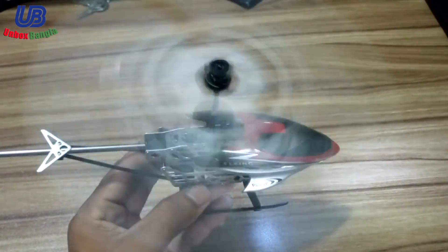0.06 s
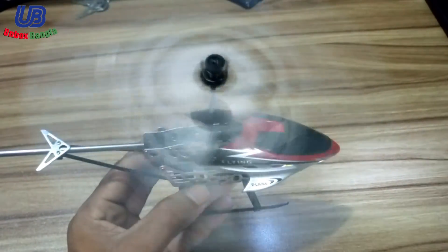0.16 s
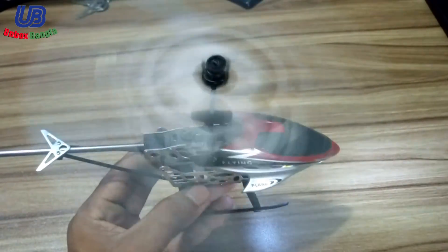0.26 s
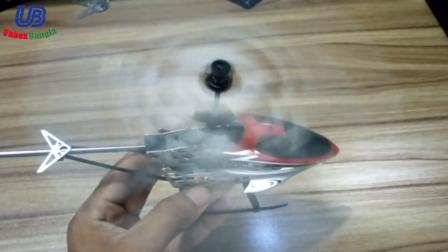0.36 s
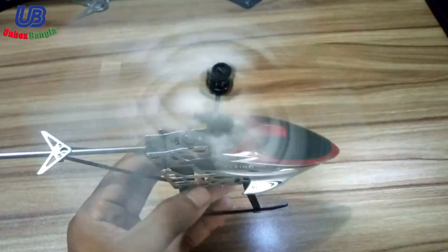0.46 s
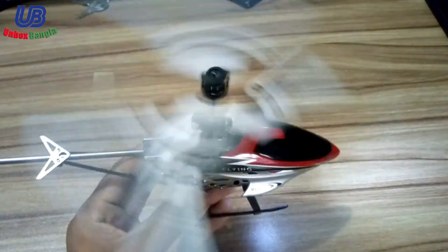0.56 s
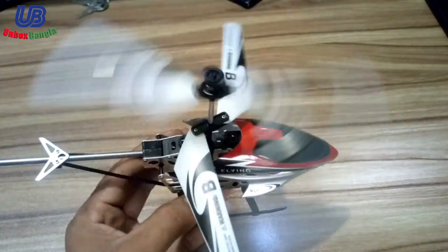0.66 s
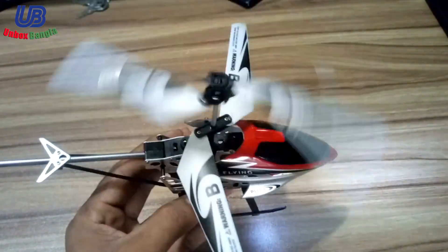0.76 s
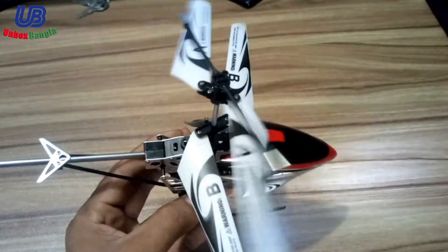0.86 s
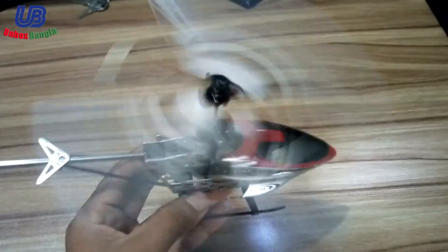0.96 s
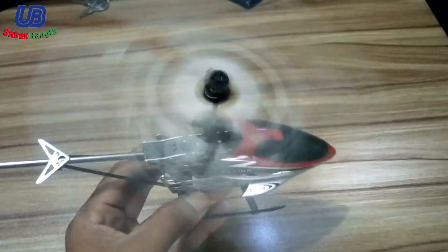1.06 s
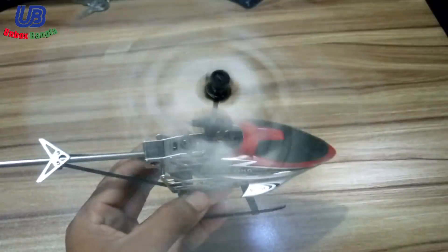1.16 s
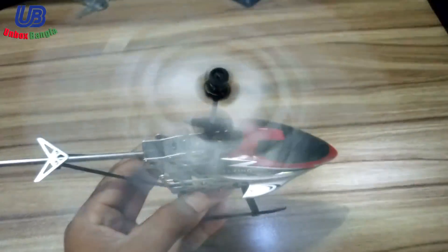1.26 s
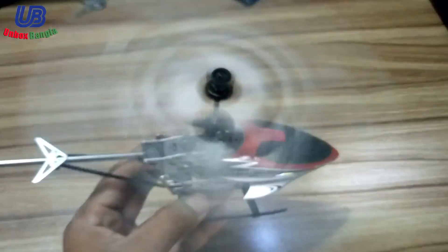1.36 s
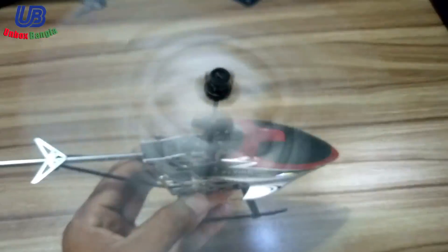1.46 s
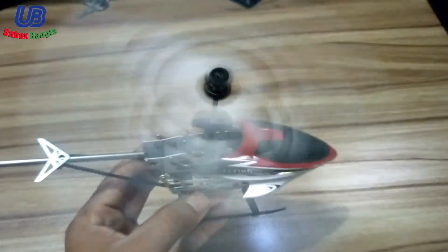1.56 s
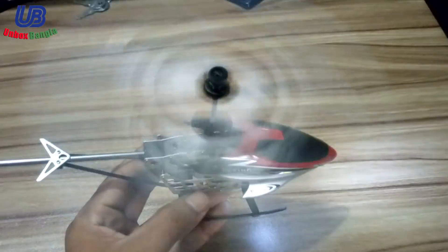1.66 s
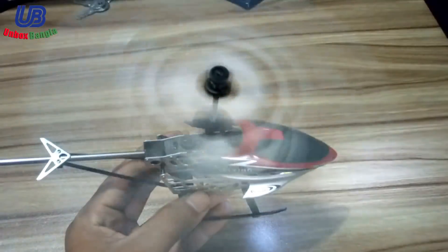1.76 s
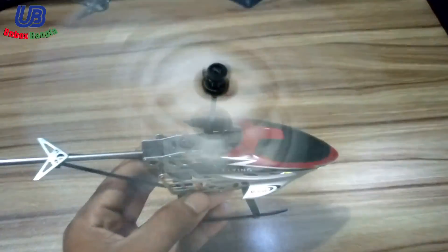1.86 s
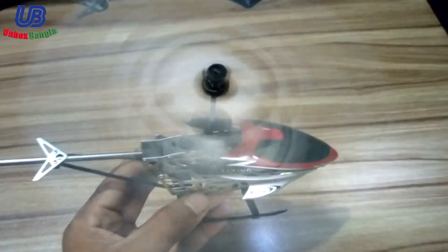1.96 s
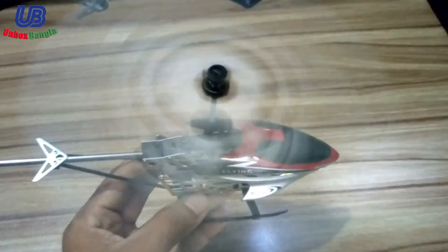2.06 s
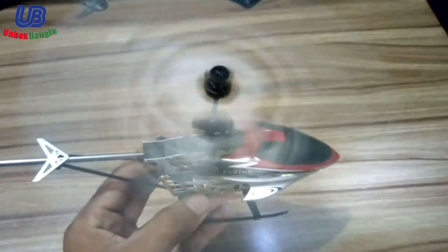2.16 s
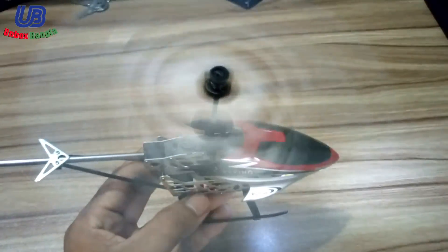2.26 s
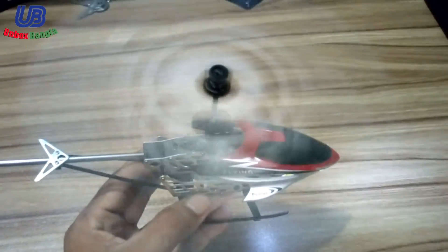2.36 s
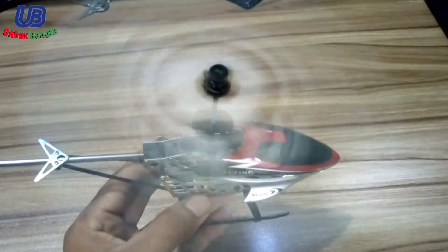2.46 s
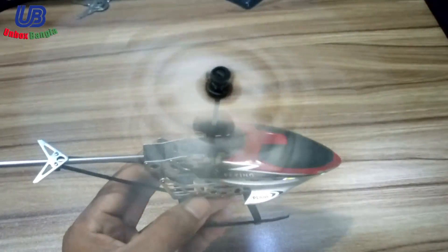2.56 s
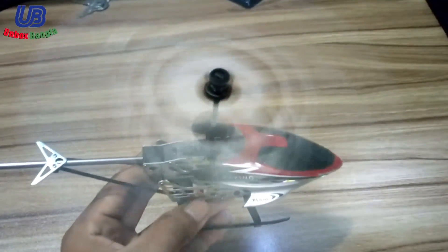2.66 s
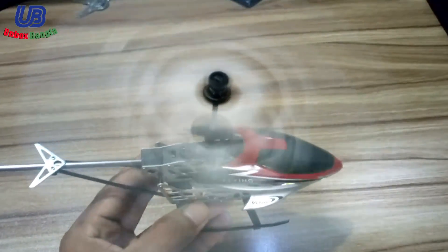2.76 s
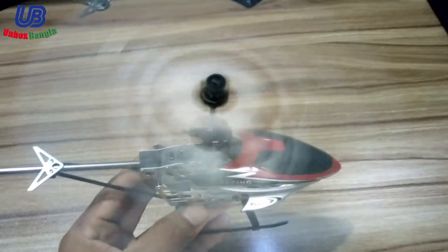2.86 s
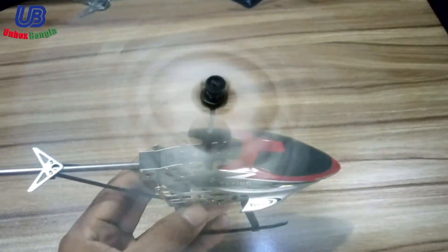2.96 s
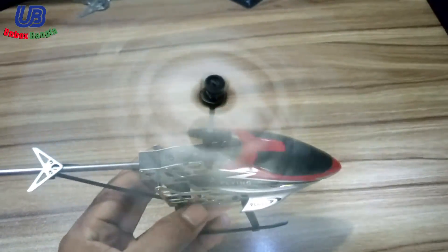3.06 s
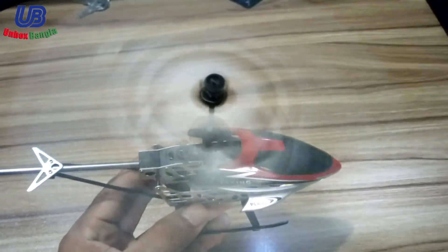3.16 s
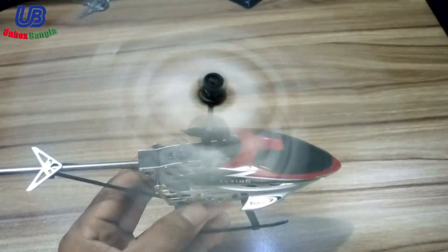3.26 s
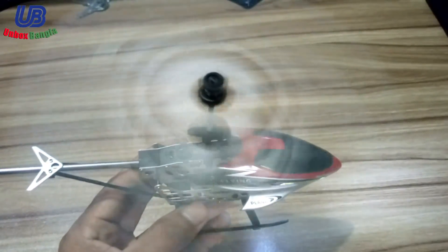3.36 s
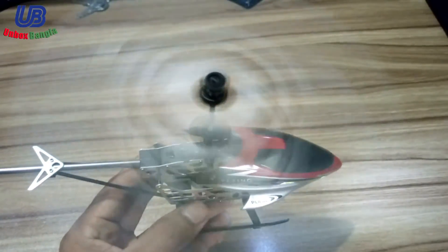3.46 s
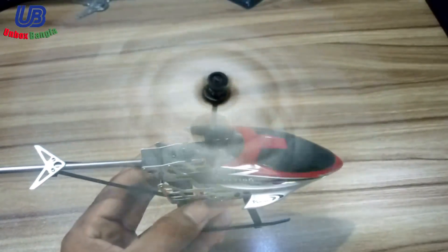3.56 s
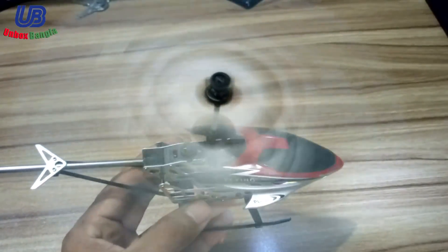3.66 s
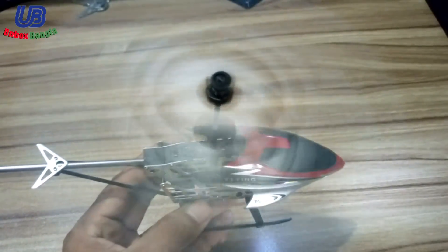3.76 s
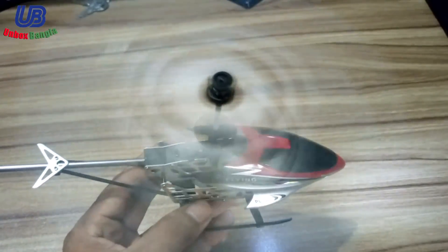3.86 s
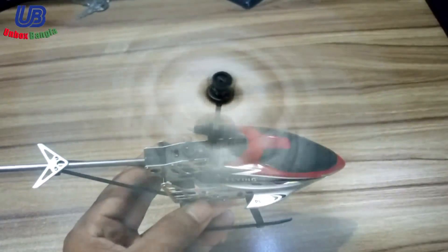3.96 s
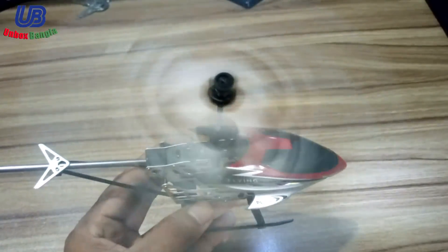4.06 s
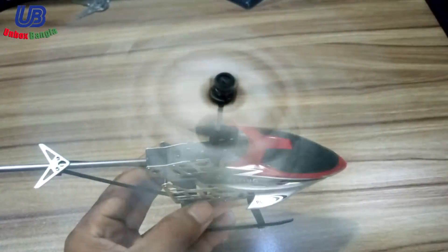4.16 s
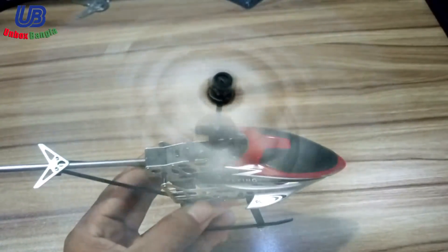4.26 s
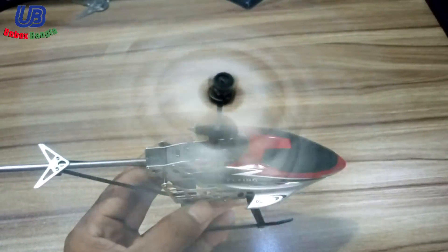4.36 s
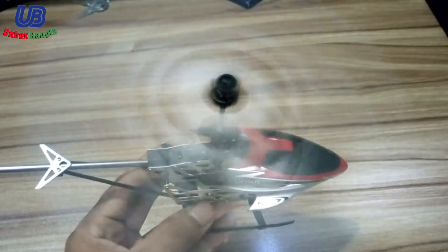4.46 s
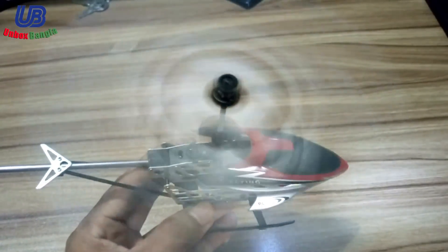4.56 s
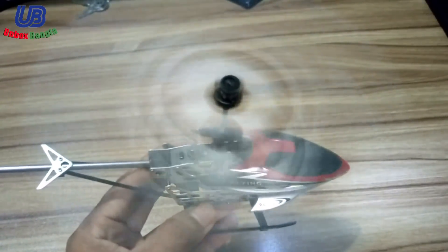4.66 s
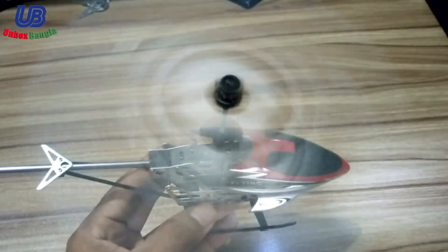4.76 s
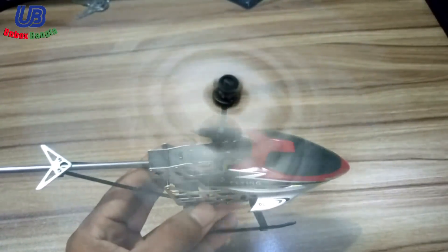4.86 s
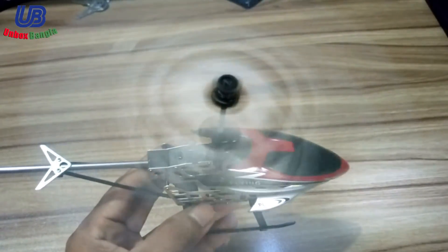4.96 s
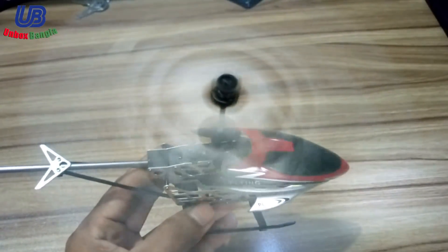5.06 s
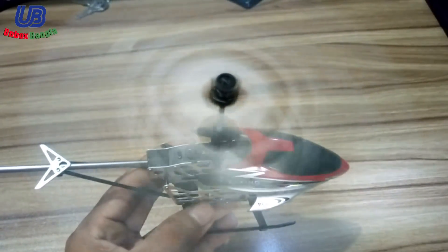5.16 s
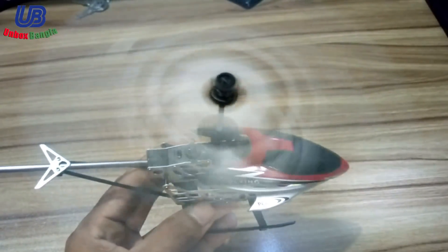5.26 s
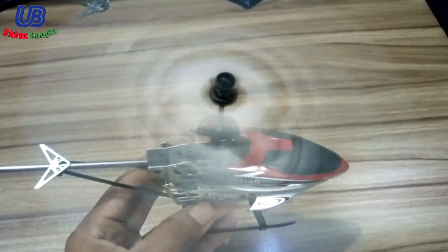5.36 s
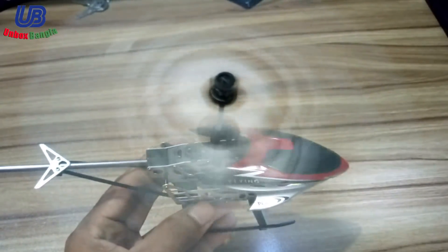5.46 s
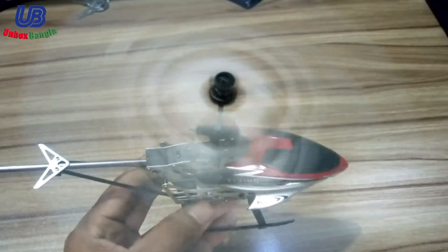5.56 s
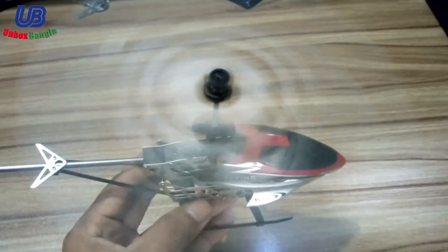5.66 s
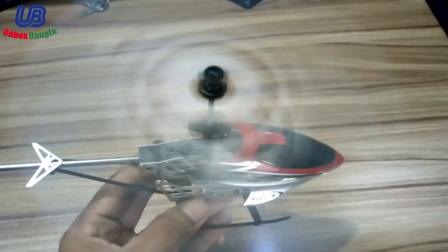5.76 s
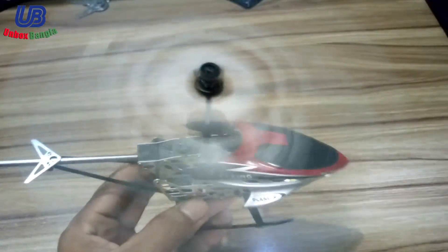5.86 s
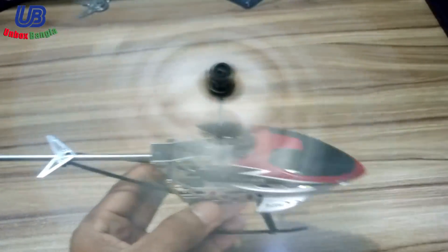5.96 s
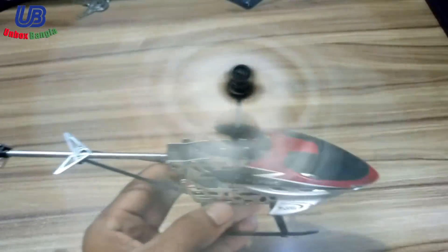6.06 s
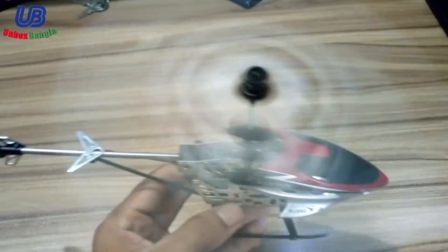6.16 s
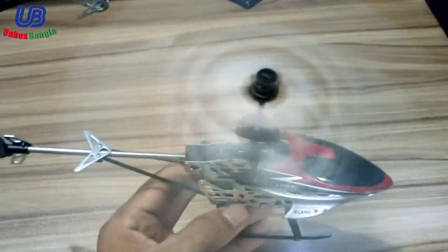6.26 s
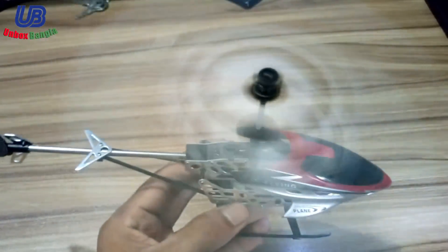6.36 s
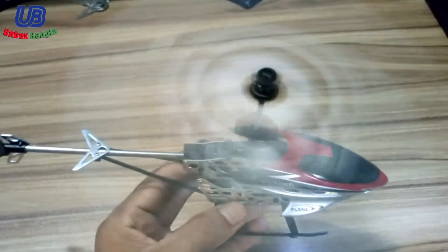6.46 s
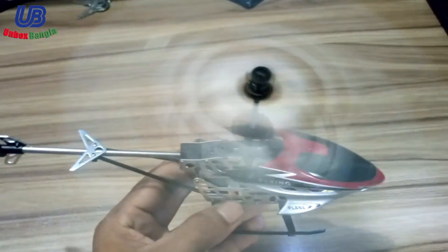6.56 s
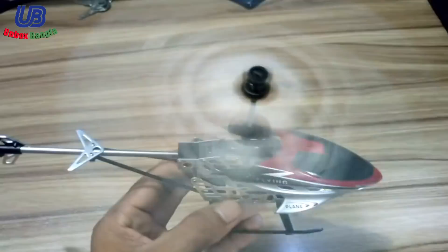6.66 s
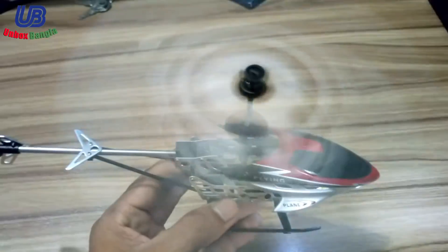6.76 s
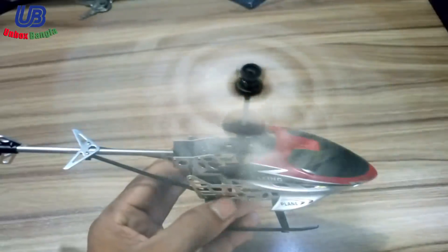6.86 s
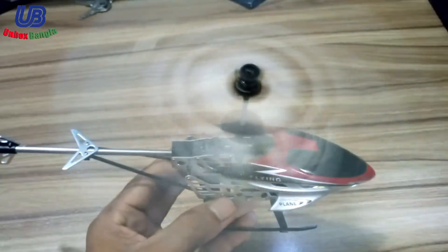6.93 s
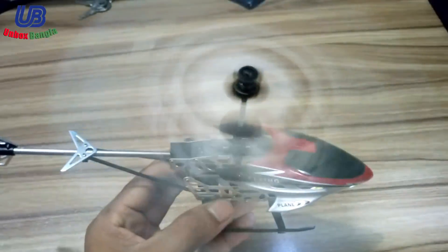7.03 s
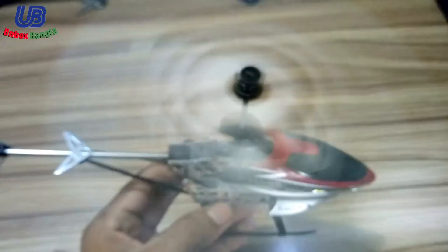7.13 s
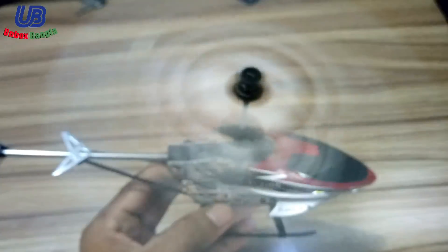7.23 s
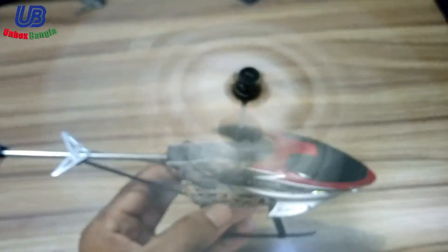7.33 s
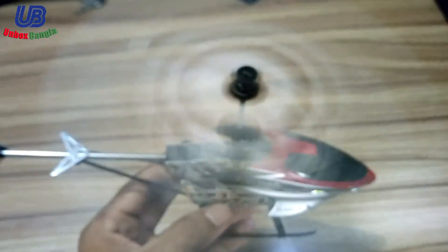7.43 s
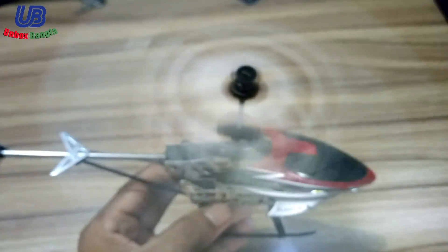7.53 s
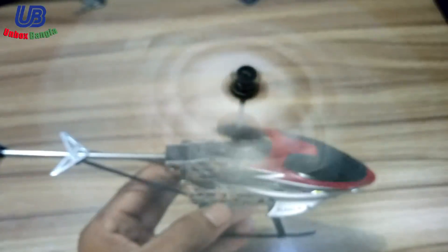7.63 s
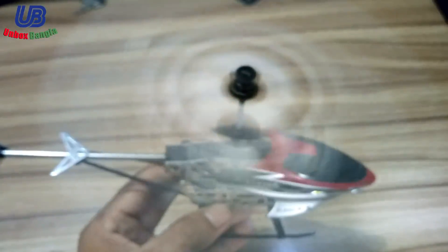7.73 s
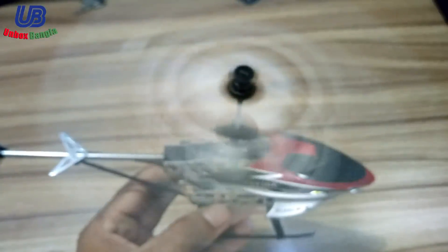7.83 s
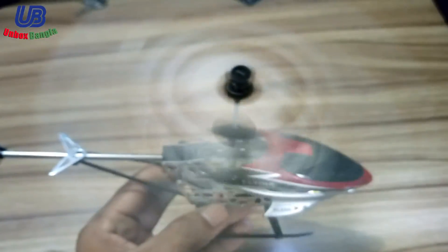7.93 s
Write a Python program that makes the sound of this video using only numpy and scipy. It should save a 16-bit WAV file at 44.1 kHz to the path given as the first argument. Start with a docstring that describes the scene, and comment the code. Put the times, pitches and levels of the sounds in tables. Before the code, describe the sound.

Small electric motors and plastic gears, close and dry in stereo over a table. The whine drops and the rattle thins almost to nothing within the first second, then snaps back and surges upward in uneven steps. A dense, harsh whir settles in, with beating rotor thrum and air noise beneath. Pitch wavers slightly, jumps higher midway, dips late and recovers.

```python
"""Over a wooden table, a hand-held toy helicopter runs close to a pair of microphone ports.
Two small motors drive two counter-rotating rotors through plastic gears: they coast down, restart,
spin up in steps and hold, with a late dip. Shaft orders are sines that whine through the shell,
gear rattle is uneven shell-coloured noise, blades thrum as beating sines in a rush of air noise,
and behind them lie low rumble and a faint hum."""
import sys
import numpy as np
from scipy import signal
from scipy.fft import rfft, irfft
from scipy.io import wavfile

SR = 44100
rng = np.random.default_rng(int(sys.argv[2]) if len(sys.argv) > 2 else 0)


def log_audio(samples):
    """Write samples as a 16-bit WAV file to the path given in sys.argv[1]."""
    # one column per channel
    frames = np.atleast_2d(samples).T
    # limit to full scale, then quantise
    limited = np.clip(frames, -1, 1)
    pcm = np.round(limited * 32767).astype(np.int16)
    wavfile.write(sys.argv[1], SR, pcm)


N = 352471   # samples, about 8 s
GEAR_RATIO = 84 / 8   # motor shaft turns for one rotor turn
PULL_LIMIT = 40   # most that the throttle counts as ahead of or behind the speed, turns per s


def from_db(db):
    """dB to gain."""
    return 10 ** (np.asarray(db) / 20)


def rms_one(x):
    """Scale to rms 1."""
    return x / np.sqrt(np.mean(x ** 2) + 1e-20)


def in_time(rows):
    """Columns of a curve table, one value a sample."""
    s, *columns = np.transpose(rows)
    return [np.interp(np.arange(N) / SR, s, column) for column in columns]


def at_hz(points, hz):
    """Read a spectrum on a log-frequency axis."""
    point_hz, value = np.transpose(points)
    return np.interp(np.log(np.maximum(hz, 1)), np.log(point_hz), value)


def drift(rate):
    """Slow chance of spread 1: noise through two equal low-pass poles at rate Hz, one value in 40 samples."""
    pole = np.exp(-80 * np.pi * rate / SR)
    noise = rng.standard_normal(N // 40 + 2002)
    slow = signal.lfilter([1], [1, -2 * pole, pole * pole], noise)[2000:]   # without the settling start
    return np.interp(np.arange(N) / 40, np.arange(len(slow)), rms_one(slow))


def resonance_offset(hz, mode_hz, width_hz):
    """Distance from a shell mode, in half widths."""
    return 2 * (hz - mode_hz) / width_hz


def shell_db(hz, modes):
    """Lift that the plastic shell gives at a frequency: resonant bumps that add in dB."""
    return sum(db / (1 + resonance_offset(hz, mode_hz, width_hz) ** 2) for mode_hz, width_hz, db in modes)


def tone(turns, level_db, pan_db, lead):
    """A stereo sine from a running count of cycles; pan and lead are shared evenly by the ports."""
    side = np.array([[.5], [-.5]])   # left, right
    gain = np.sqrt(2) * from_db(level_db + side * pan_db)
    return gain * np.sin(2 * np.pi * (turns + rng.random()) + side * lead)


def stereo_noise(colour_db, source):
    """Spectrum of a stereo noise: a shared part reaches the left port first, the right adds its own."""
    # Each row: frequency in Hz, left-right likeness from 0 to 1.
    likeness = [(40, 0.17), (110, 0.99), (300, 0.7), (850, 0.83), (1400, 0.33), (2100, 1), (3500, 0.15),
                (6000, 0.12), (8000, 0.077)]
    # Each row: frequency in Hz, how much louder the left port is in dB.
    left_louder = [(60, 2.5), (200, 2.5), (380, 1.5), (700, .3), (1290, 2.5), (2380, 3.5), (4400, 6.5),
                   (8120, 7), (15000, 9.5)]
    left_lead_s = 0.00012
    hz = np.arange(N // 2 + 1) * SR / N
    shared, own = rfft(source)
    alike = np.clip(at_hz(likeness, hz), 0, 1)
    delayed = shared * np.exp(-2j * np.pi * hz * left_lead_s)
    right = alike * delayed + np.sqrt(1 - alike ** 2) * own
    pan = from_db(at_hz(left_louder, hz) / 2)
    both = from_db(colour_db(hz)) * np.array([shared * pan, right / pan])
    middle = irfft(both, N).mean(axis=0)
    return hz, both / np.std(middle)


def patchy(hz, spectrum, centres_hz, shared_db, own_db, rate, treble_db=0, slowness=0):
    """Overlapping bands flicker partly together, partly alone; the top bands follow the treble control."""
    # Slow gears knock duller. Each row: frequency in Hz, change in dB at full slowness.
    slow_colour = [(900, 15), (1800, -1), (2600, 4), (3800, -3), (6000, -0.9), (10000, 1), (14000, -5.5)]
    out, together = 0, drift(rate)
    for k, centre_hz in enumerate(centres_hz):
        band = np.interp(np.log(hz + 1), np.log(centres_hz), np.arange(len(centres_hz)) == k)
        gain_db = shared_db * together + own_db * drift(rate)
        gain_db = gain_db + (treble_db if centre_hz > 8000 else 0)
        gain_db = gain_db + slowness * at_hz(slow_colour, centre_hz)
        out = out + from_db(gain_db) * irfft(spectrum * band, N)
    return out


def motors():
    """Speeds of both shafts, which rotor inertia holds behind the throttle, and how far it runs ahead."""
    # Throttle moves. Each row: start in seconds, stick travel in seconds, speed then asked of the
    # faster motor in turns per s, of the slower motor in turns per s.
    throttle = [(0.004, 0.07, 370.8, 338.3), (0.152, 0.42, 82.0, 76.6), (0.815, 0.02, 280, 257),
                (0.925, 0.02, 345, 316), (1.13, 0.04, 372, 342), (1.26, 0.06, 288, 264),
                (1.68, 0.03, 389.5, 354.5), (1.946, 0.099, 458.5, 425.0), (2.187, 0.152, 473.4, 434.3),
                (2.91, 0.03, 490, 449), (3.2, 0.05, 496.6, 455.5), (3.52, 0.021, 498.5, 459.4),
                (3.72, 0.03, 495, 458), (3.84, 0.03, 475, 440), (4.09, 0.03, 486, 448.2),
                (4.3, 0.1, 481, 446), (4.52, 0.061, 538.5, 494), (4.8, 0.02, 535.1, 490.4),
                (5.338, 0.14, 533.6, 489.4), (6.725, 0.02, 484, 444), (6.95, 0.03, 476, 440),
                (7.04, 0.03, 506, 464), (7.19, 0.05, 535, 490), (7.42, 0.05, 532.2, 488.2)]
    # Speed at the start in turns per s: faster motor, slower motor.
    start_speeds = (327.9, 302.1)
    spin_lag_s = .1
    s, travel_s, *settles = np.transpose(throttle)
    move_s = np.column_stack([s, s + travel_s]).ravel()
    pole = np.exp(-1 / (spin_lag_s * SR))
    speeds, pulls = [], []
    for start, settle in zip(start_speeds, settles):
        before = np.r_[start, settle[:-1]]
        asked = np.interp(np.arange(N) / SR, move_s, np.column_stack([before, settle]).ravel())
        speed = start + signal.lfilter([1 - pole], [1, -pole], asked - start)
        speeds.append(speed)
        pulls.append(np.clip(asked - speed, -PULL_LIMIT, PULL_LIMIT))
    return speeds, pulls


def slackness(speed):
    """0 with teeth in full contact, 1 when loose: lightly loaded teeth lose contact at low speed."""
    slack_speed = 318   # turns per s
    return np.clip(8 * (1 - speed / slack_speed), 0, 1)


def motor_tone(order, speed, turns, level_db, swing=0):
    """One shaft order; slack teeth break it up once a rotor turn, its pitch divides it between the ports."""
    # How a tone reaches the ports. Each row: frequency in Hz, left-right difference in dB, left lead in rad.
    ports = [(500, 1.5, .3), (1150, 1.2, .8), (1600, -3, 2.2), (1895, 3, 1.1), (1915, 0, 1.6),
             (1940, 6, 2.2), (1985, 3, 1), (2050, 2, .8), (2140, -1.2, .7), (3100, 6, 3), (3470, 3.5, 2.9),
             (3650, 9, 2.4), (3900, 14, 1.5), (4280, 3, 3.6), (4420, 8, 4.2), (4750, 8, 4.2),
             (5400, 11, 3.8), (5880, 3, 4.1), (6400, 11, 4.3)]
    slack_db = 18   # deepest gap
    hz, pan_db, lead = np.transpose(ports)
    pitch_hz = order * speed
    pan_db = np.interp(pitch_hz, hz, pan_db)
    even_db = -10 * np.log10(np.cosh(pan_db * np.log(10) / 20))   # total power stays the same
    gap_db = slack_db * slackness(speed) * np.sin(np.pi * turns / GEAR_RATIO) ** 2
    return tone(order * turns + swing, level_db + even_db - gap_db, pan_db, np.interp(pitch_hz, hz, lead))


def room():
    """Low rumble as coloured noise, and a faint hum of steady pitch."""
    # Each row: time in seconds, rumble level in dB, hum level in dB.
    rumble_levels = [(0, -52, -56), (.4, -51, -71), (.85, -48.5, -69), (1.2, -46.5, -53), (1.7, -46, -53),
                     (2.7, -47.5, -53), (4.5, -53, -85), (7.99, -50, -63)]
    # Rumble spectrum. Each row: frequency in Hz, relative dB per Hz.
    rumble_colour = [(15, -30), (30, -14), (70, 2.5), (130, -3.5), (230, -2.5), (400, -7), (600, -11.5),
                     (1000, -17.5), (1500, -19), (3000, -30), (6000, -54), (9000, -80)]
    hum_hz = 329.3
    rumble_db, hum_db = in_time(rumble_levels)
    _, spectrum = stereo_noise(lambda f: at_hz(rumble_colour, f), rng.standard_normal((2, N)))
    rumble = from_db(rumble_db + 1.5 * drift(4)) * irfft(spectrum, N)
    hum = tone(hum_hz * np.arange(N) / SR, hum_db + 1.5 * drift(4), 1.5, .2)
    return rumble + hum


def gear_catch():
    """The coasting gears catch once: a short dry tick of decaying sines rings in the shell."""
    # Each row: start in seconds, level of each ringing mode in dB ahead of its rise and decay.
    catches = [(0.6912, -43.5)]
    # Ringing frequencies in Hz.
    ringing_hz = (1878, 2150)
    out = 0
    for s, db in catches:
        since = np.maximum(np.arange(N) / SR - s, 0)
        shape = (1 - np.exp(-since / .0005)) * from_db(db - 60 * since / .014)   # falls 60 dB in 14 ms
        out = out + shape * sum(np.sin(2 * np.pi * ring_hz * since) for ring_hz in ringing_hz)
    return out


def blades(speeds, turns):
    """Two blades a rotor thrum and beat; upper and lower blades crossing give sum tones; air rushes past."""
    # Each row: multiple of faster rotor, multiple of slower rotor, relative level in dB,
    # left-right difference in dB, left lead in rad.
    blade_tones = [(2, 0, 0.1, 4.5, 1.25), (0, 2, -.5, 4.5, -1.8), (1, 2, -16, 3.0, .1),
                   (2, 2, -2.5, 2.8, .4), (0, 8, -18, 1.5, .3), (4, 4, -7, 2.1, .25), (6, 6, -13, .3, .1),
                   (8, 8, -12, .2, .8)]
    # Each row: faster motor in turns per s, air level in dB, thrum level in dB.
    rotor_by_speed = [(90, -84, -71), (150, -59, -71), (250, -57.5, -67), (353, -56, -61),
                      (372, -48, -47.5), (454, -42, -44), (485, -39, -40.5), (535, -38.5, -39)]
    # Air spectrum. Each row: frequency in Hz, relative dB per Hz.
    air_colour = [(15, -30), (40, -14), (65, -16), (130, -12.5), (230, -14.5), (330, -15.5), (450, -9),
                  (620, -8.5), (850, -5), (1050, -10.5), (1400, -24), (3000, -69)]
    fast, slow = np.array(turns) / GEAR_RATIO
    speed, *levels = np.transpose(rotor_by_speed)
    air_db, thrum_db = [np.interp(speeds[0], speed, db) for db in levels]
    thrum = 0
    for fast_multiple, slow_multiple, db, pan_db, lead in blade_tones:
        cycles = fast_multiple * fast + slow_multiple * slow
        thrum = thrum + tone(cycles, thrum_db + db + .9 * drift(3), pan_db, lead)
    hz, spectrum = stereo_noise(lambda f: at_hz(air_colour, f), rng.standard_normal((2, N)))
    air = patchy(hz, spectrum, np.geomspace(40, 1200, 6), 0.22, 0.56, 22.0)
    return thrum + from_db(air_db) * air


def gear_rattle(speeds, turns, rattle_db):
    """Loose teeth knock densely and unevenly; the knocking swells once a turn of each main gear."""
    # Knocking spectrum. Each row: frequency in Hz, relative dB per Hz.
    knock_colour = [(500, -54), (800, -47), (1100, -15.5), (1500, -16.5), (2300, -8), (2700, -12.5),
                    (3200, -3.5), (4300, -2), (6600, -2), (7700, -7.5), (8400, -14), (11000, -16.5),
                    (13600, -17.5), (14900, -11.5), (15600, -9)]
    # Shell modes at every speed. Each row: frequency in Hz, width in Hz, lift in dB.
    shell_modes = [(1140, 530, 2.5), (1868, 200, 14), (3110, 230, 2.5), (3720, 58, 6.5), (4360, 270, 4),
                   (6130, 200, -1.5)]
    # Shell modes that stand out while the gears turn slowly. Each row: frequency in Hz, width in Hz, lift in dB.
    slow_modes = [(1130, 320, -0.5), (1450, 300, 0.5), (2100, 300, 2), (3530, 120, 2), (3700, 250, -5.5),
                  (4300, 230, -6.5), (4580, 530, 5.5), (5440, 140, 1), (5780, 110, 5.5), (6800, 290, 3.5),
                  (7240, 960, -3.5)]
    slow_below, slow_fade = 445, 50   # turns per s where those start to show, and over how many they grow
    coast_below, coast_fade = 260, 110   # the same in turns per s for nearly idle teeth knocking in bursts
    clatter_db = 2.2   # spread of the bursts
    dull_below_db, dulling = -33.5, 1   # under this rattle level the treble loses 1 dB more per dB

    coasting = np.clip((coast_below - speeds[0]) / coast_fade, 0, 1)
    swell_db = sum(db * np.sin(2 * np.pi * count / GEAR_RATIO) for count, db in zip(turns, (.5, .8)))
    uneven_db = 0.33 * drift(400) + clatter_db * coasting * drift(35)
    knocks = rng.standard_normal((2, N)) * from_db(uneven_db) * from_db(swell_db)
    hz, spectrum = stereo_noise(lambda f: at_hz(knock_colour, f) + shell_db(f, shell_modes), knocks)

    slowness = np.minimum(2 * (1 - speeds[0] / speeds[0].max()), 1)   # full at half of top speed
    treble_db = dulling * np.minimum(rattle_db - dull_below_db, 0)
    rattle = patchy(hz, spectrum, np.geomspace(900, 14000, 10), 0.32, 1.0, 14.0, treble_db, slowness)
    ringing = irfft(rfft(rattle) * from_db(shell_db(hz, slow_modes)), N)
    share = np.clip((slow_below - speeds[0]) / slow_fade, 0, 1)
    return from_db(rattle_db) * (rattle + share * (ringing - rattle))


def shaft_orders(speeds, turns, pulls, effort_db):
    """Weaker orders stand out as they glide through shell modes, and flicker as the teeth chatter."""
    # Each row: motor (0 faster, 1 slower), shaft order, relative level in dB.
    orders = [(0, 3, -11.5), (0, 5, -10), (1, 9, -15.5), (0, 10, -9), (1, 4, -18), (1, 3, -1),
              (1, 5, -15.5), (1, 6, -8.5), (1, 7, -12), (1, 10, -13), (1, 13, -11), (1, 14, -12)]
    # Narrow shell modes that pick single orders out. Each row: frequency in Hz, width in Hz, level in dB.
    tone_modes = [(1140, 160, -14), (1590, 56, -8), (1860, 115, 3.5), (1990, 120, -3), (2500, 62, -22),
                  (3300, 280, -5), (4370, 140, 2), (4750, 600, -3), (5550, 200, -1), (6000, 300, 0),
                  (6510, 150, -0.5), (7370, 420, -19)]
    order_pull_db = .09   # gain in dB per turn per s by which the throttle runs ahead
    out = 0
    for motor, order, db in orders:
        motor, order = round(motor), round(order)
        speed, count = speeds[motor], turns[motor]
        pitch_hz = order * speed[::64]   # the shell's colour is worked out every 64 samples
        power = sum(from_db(2 * mode_db) / (1 + resonance_offset(pitch_hz, mode_hz, width_hz) ** 4)
                    for mode_hz, width_hz, mode_db in tone_modes)
        colour_db = np.repeat(10 * np.log10(power), 64)[:N]
        swing = 0.0072 * order * np.sin(2 * np.pi * count / GEAR_RATIO)   # an uneven main gear, in cycles
        level_db = effort_db + db + colour_db + order_pull_db * pulls[motor] + 3 * drift(14)
        out = out + motor_tone(order, speed, count, level_db, swing)
    return out


def whines(speeds, turns, pulls):
    """The loud orders; an uneven main gear swings pitch and strength once a rotor turn."""
    # Each row: motor (0 faster, 1 slower), shaft order, phase swing over a rotor turn in cycles,
    # level swing in dB, quick waver in dB, slow fading in dB.
    whine_kinds = [(0, 4, .03, 1, 2, .6), (0, 8, .08, 0, 2, 3), (1, 8, .12, 3, 1.5, .5),
                   (1, 11, .25, 0, 3, 1), (1, 12, .03, 0, 2.5, .7), (0, 12, .05, 0, 2.5, 1)]
    # How strongly each whine sounds at the pitch it has reached: one curve a whine, in the same order.
    # Each row of a curve: frequency in Hz, level in dB.
    whine_by_pitch = [
        [(700, -90), (980, -44), (1170, -40), (1270, -70), (1480, -66), (1620, -41), (1750, -37), (1840, -27),
         (1895, -26), (1915, -29), (1940, -31), (1960, -33), (1985, -30.5), (2015, -34), (2050, -32),
         (2100, -31), (2135, -38)],
        [(1200, -90), (1900, -55), (2700, -60), (2900, -37), (3100, -33), (3550, -34), (3680, -48), (4000, -50),
         (4270, -44)],
        [(1100, -90), (2000, -50), (2500, -54), (2800, -62), (3200, -45), (3380, -30), (3480, -29), (3570, -34),
         (3660, -31), (3730, -34), (3850, -31), (3915, -27)],
        [(1500, -90), (3000, -58), (3900, -55), (4350, -32), (4700, -30), (4900, -39), (5030, -38), (5380, -44)],
        [(1700, -85), (3300, -62), (4300, -58), (5200, -50), (5330, -41), (5400, -36.5), (5500, -37),
         (5545, -31.5), (5640, -32), (5760, -35), (5855, -37), (5872, -31.5)],
        [(3000, -90), (5000, -56), (5500, -39), (5680, -43), (5800, -38), (5980, -35.5), (6100, -41),
         (6400, -43)],
    ]
    # Gain of each whine in dB per turn per s by which the throttle runs ahead of the speed.
    whine_pull_db = [0.05, .12, .03, .1, 0, .05]
    idle_db = 16   # slack teeth hardly touch while the speed neither rises nor falls
    out = 0
    for kind, by_pitch, pull_db in zip(whine_kinds, whine_by_pitch, whine_pull_db):
        motor, order, swing, swing_db, waver_db, fade_db = kind
        speed, count, pull = speeds[motor], turns[motor], pulls[motor]
        rotor = 2 * np.pi * count / GEAR_RATIO
        idle = slackness(speed) * (1 - np.abs(pull) / PULL_LIMIT)
        level_db = at_hz(by_pitch, order * speed) + pull_db * pull - idle_db * idle
        level_db = level_db + fade_db * drift(0.99) + swing_db * np.cos(rotor) + waver_db * drift(27)
        out = out + motor_tone(order, speed, count, level_db, swing * np.sin(rotor))
    return out


def scene():
    """All sources at the two ports."""
    # Gear rattle. Each row: time in seconds, level in dB.
    rattle_level = [(0.0, -34), (0.27, -34), (0.44, -40.5), (0.64, -52.5), (0.8, -72), (0.826, -63),
                    (0.838, -37.5), (0.88, -38.5), (0.98, -31.5), (1.23, -31.5), (1.28, -33), (1.67, -32.5),
                    (1.71, -29.5), (1.93, -28), (2.0, -28), (3.7, -27.5), (4.4, -27.5), (5.1, -27),
                    (6.4, -27), (7.1, -27), (7.99, -27)]
    speed_jitter = .011   # turns (rms) by which a shaft runs ahead or behind
    speeds, pulls = motors()
    turns = [np.cumsum(speed) / SR + speed_jitter * drift(4.4) for speed in speeds]
    rattle_db, = in_time(rattle_level)
    background = room() + gear_catch() + blades(speeds, turns)
    gears = gear_rattle(speeds, turns, rattle_db)
    return background + gears + shaft_orders(speeds, turns, pulls, rattle_db) + whines(speeds, turns, pulls)


def record(dry):
    """A steep elliptic low-pass cuts the top at 15.5 kHz."""
    return signal.sosfilt(signal.ellip(12, .5, 80, 15500, fs=SR, output="sos"), dry)


dry = scene()
out = record(dry)
log_audio(out)
```